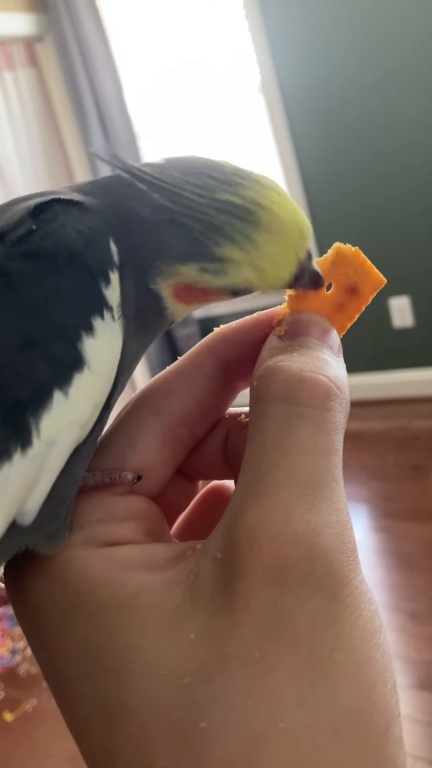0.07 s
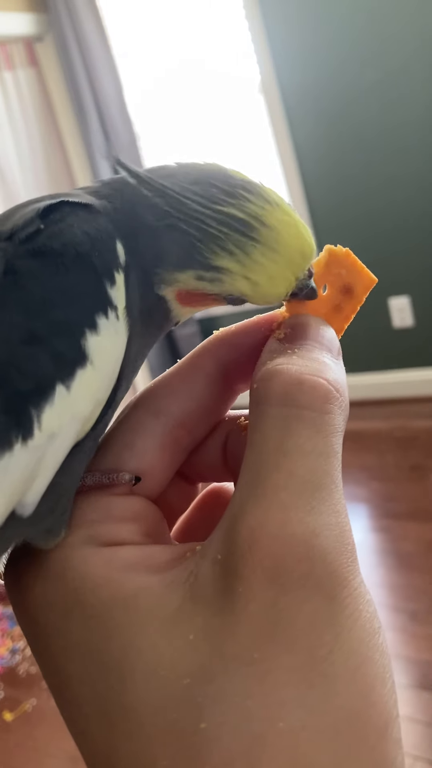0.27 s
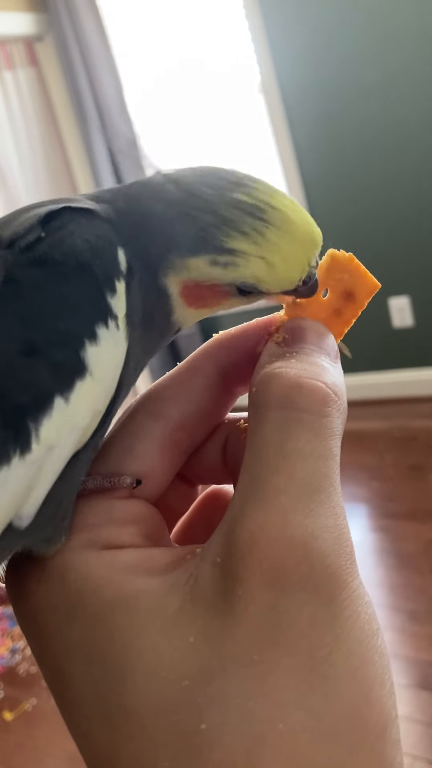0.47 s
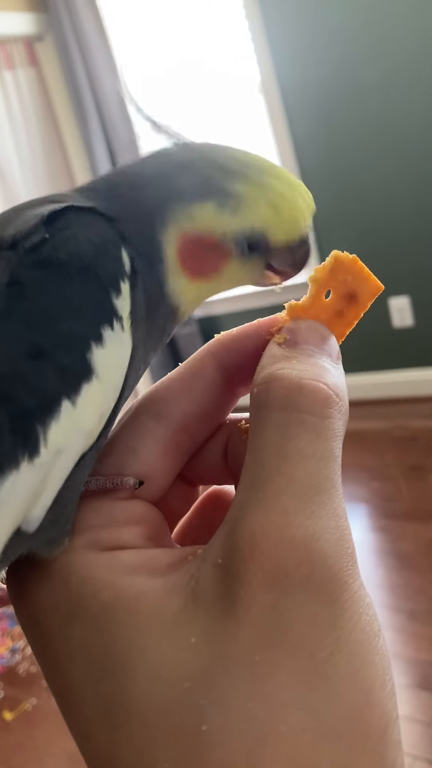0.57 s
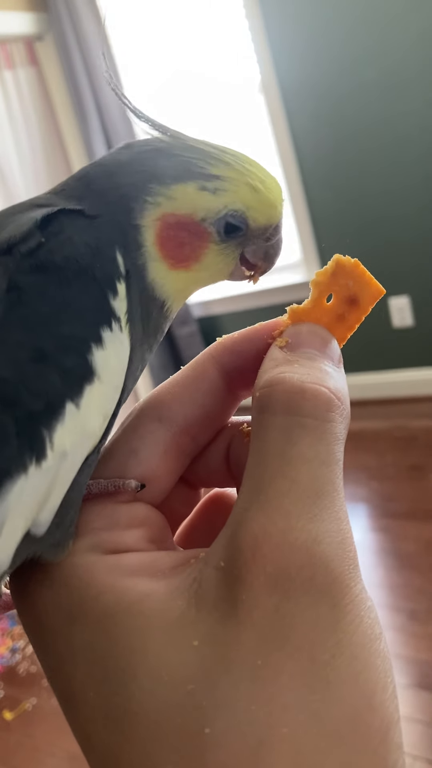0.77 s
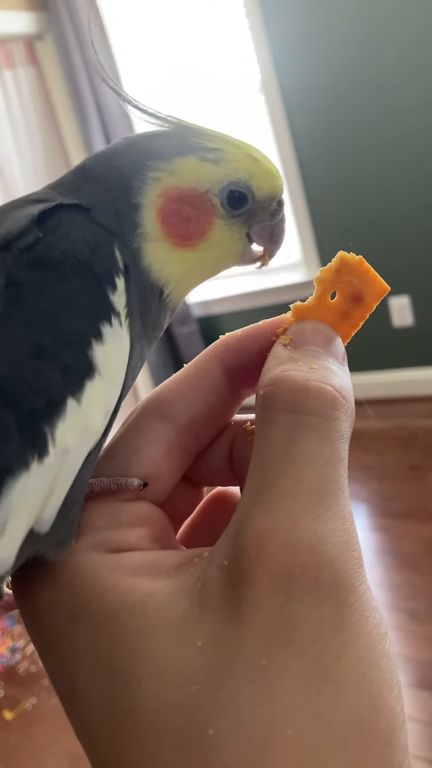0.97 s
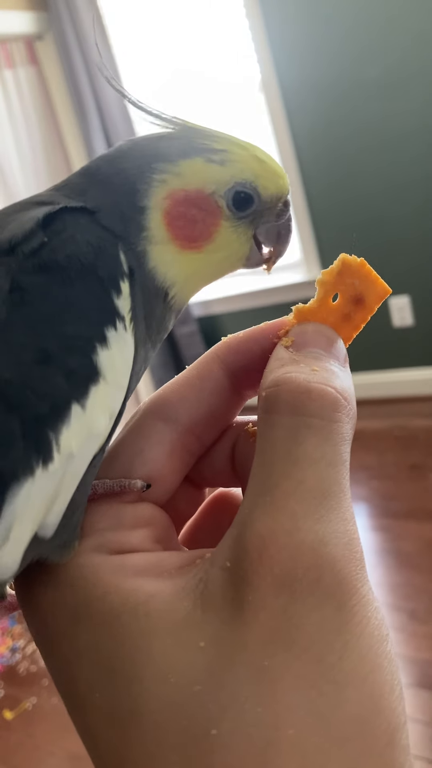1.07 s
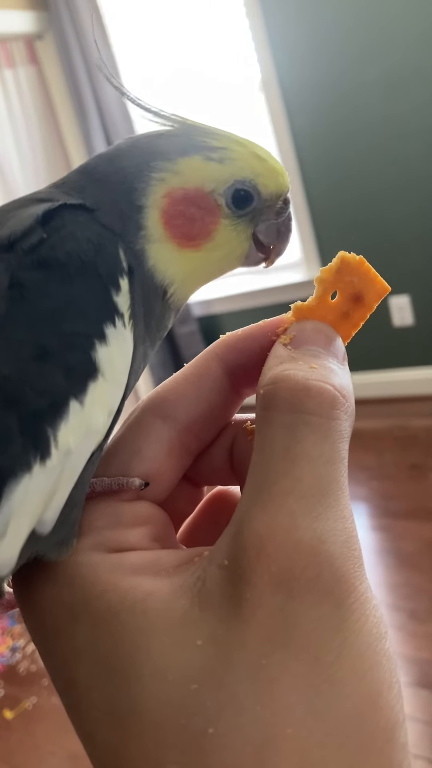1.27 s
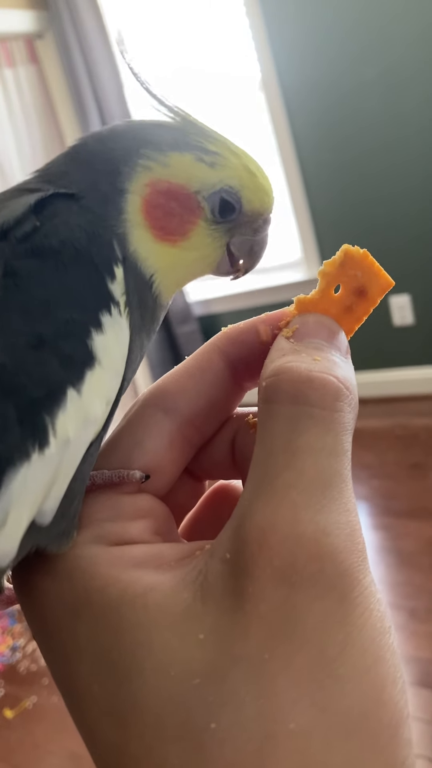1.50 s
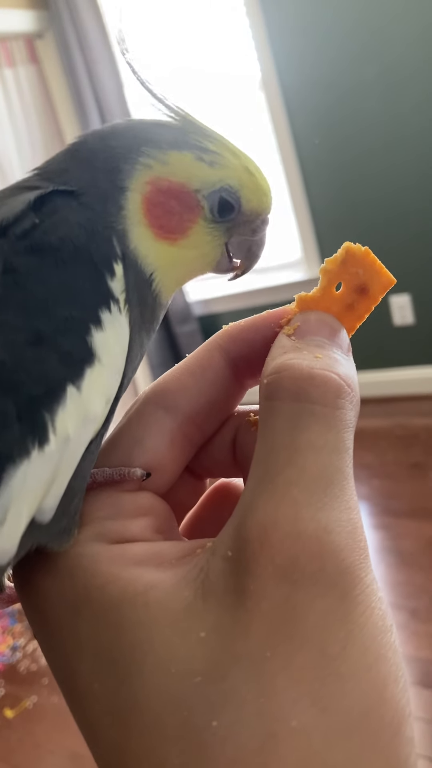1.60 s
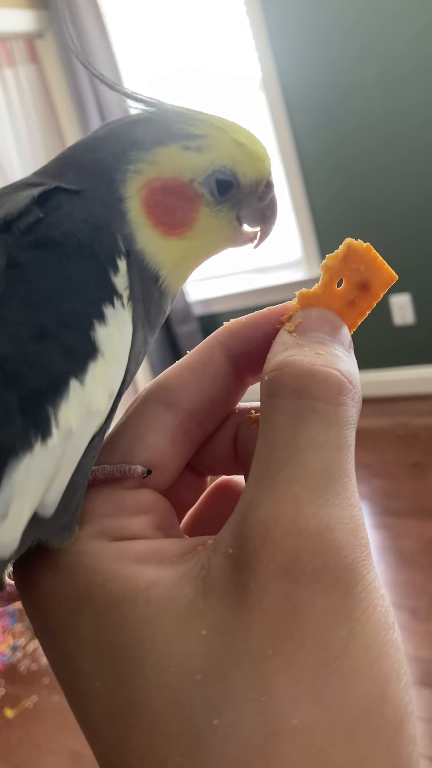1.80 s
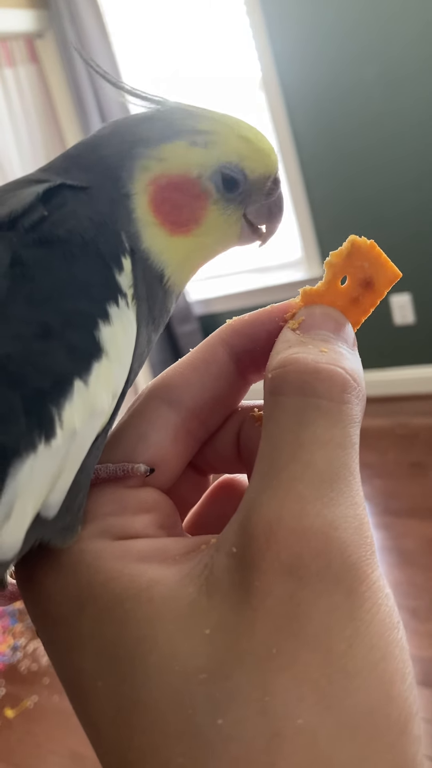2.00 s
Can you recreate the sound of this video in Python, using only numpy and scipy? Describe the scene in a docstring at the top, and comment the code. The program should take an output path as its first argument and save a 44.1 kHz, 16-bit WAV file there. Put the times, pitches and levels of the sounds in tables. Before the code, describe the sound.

A cockatiel crunches a dry cracker close to the microphone. The loudest, sharpest snaps come at about 0.2, 0.3 and 0.4 seconds as it bites pieces off. From 0.6 to 2 seconds it nibbles the crumbs with softer clicks, short crackles and a few tiny hollow beak knocks. The small room adds a soft tail, with a faint rumble and appliance hum throughout.

```python
"""A cockatiel eats a dry cracker close to the microphone, over a low rumble and an appliance's hum.
In the first half second it bites pieces off: each fracture is a snap under a millisecond long.
From then on it nibbles and grinds the crumbs, with softer snaps and short bouts of crackle between.
Now and then the beak closes through a piece with a hollow knock.
A small room answers with a soft tail."""
import sys
import numpy as np
from scipy import signal
from scipy.fft import rfft, irfft, next_fast_len
from scipy.io import wavfile
from scipy.ndimage import uniform_filter1d

SR = 44100
rng = np.random.default_rng(int(sys.argv[2]) if len(sys.argv) > 2 else 0)


def wav_out(sig):
    """Save sig, one row per channel (or a flat mono array), as 16-bit PCM at SR to the path in sys.argv[1]."""
    wavfile.write(sys.argv[1], SR, np.round(np.clip(np.atleast_2d(sig).T, -1, 1) * 32767).astype(np.int16))


N = 90404


def amp(db):
    """Decibels to gain."""
    return 10 ** (np.asarray(db) / 20)


def unit(x):
    """Scales to rms 1."""
    return x / np.sqrt(np.mean(abs(x) ** 2) + 1e-20)


def read(points, hz):
    """Interpolates rows of (Hz, value) along log frequency."""
    f, value = np.transpose(points)
    return np.interp(np.log(hz + 1), np.log(f + 1), value)


def level(points):
    """Gain per sample from rows of (s, dB)."""
    return amp(np.interp(np.arange(N) / SR, *np.transpose(points)))


def colour(x, points):
    """Filters by rows of (Hz, dB)."""
    size = next_fast_len(x.shape[-1] + 4096)
    gain = amp(read(points, np.fft.rfftfreq(size, 1 / SR)))
    return irfft(rfft(x, size) * gain, size)[..., :x.shape[-1]]


def add(mix, start_s, sound):
    """Mixes a sound in at start_s."""
    part = mix[max(round(start_s * SR), 0):][:len(sound)]
    part += sound[:len(part)]


# Rumble spectrum. Each row: frequency in Hz, relative density in dB.
RUMBLE_SPECTRUM = [(15, -30), (29, -26), (44, 6), (80, -2), (100, 0.5), (140, -1), (220, -2.5),
                   (320, -11.5), (500, -15), (1000, -31.5), (2500, -40.5), (6000, -40.5), (16000, -44)]
# Each row: frequency in Hz, left-right coherence from 0 to 1.
RUMBLE_COHERENCE = [(50, .9), (150, 0.83), (300, 0.7), (600, 0.0042), (1200, 0), (16000, 0)]
# Each row: time in seconds, gain in dB.
RUMBLE_ENVELOPE = [(0, 0), (.5, 0.5), (1.05, -1), (1.35, 4.5), (1.7, 2), (2.05, 1.5)]


def rumble(level_db=-63):
    """Low room rumble and faint hiss; only the bass is alike in both channels."""
    hz = np.fft.rfftfreq(N, 1 / SR)
    left, independent = rfft(rng.standard_normal((2, N)))
    coherence = read(RUMBLE_COHERENCE, hz)
    right = coherence * left + np.sqrt(1 - coherence ** 2) * independent
    noise = irfft(np.array([left, right]) * amp(read(RUMBLE_SPECTRUM, hz)), N)
    return unit(noise) * amp(level_db) * level(RUMBLE_ENVELOPE)


# Each row: frequency in Hz, rms waver relative to the tone, envelope as (seconds, dB) points.
HUM_LINES = [(120.1, 0.14, [(0, -63), (.4, -67), (.56, -56.5), (.68, -62.5), (.8, -58.5), (1.03, -67),
             (1.15, -59.5), (1.38, -70), (1.5, -58.5), (1.65, -66), (1.87, -57), (2.05, -72.5)]),
             (164.1, 0.11, [(0, -78.5), (1.12, -73.5), (1.28, -63), (1.7, -62.5), (2.05, -64)]),
             (138.6, 0.48, [(0, -74), (.4, -69), (.6, -80), (.95, -82.5), (1.1, -63.5), (1.3, -66.5),
             (1.45, -84)]), (80.7, 0.11, [(0, -82.5), (.55, -64), (1.2, -75), (1.6, -66), (2.05, -68)]),
             (234.1, 0.82, [(0, -72.5), (1, -77), (2.05, -73)]), (829.5, .4, [(0, -90), (.5, -81),
             (1.1, -103.5), (1.45, -79), (1.7, -103)])]


def appliance_hum(waver_hz=6):
    """Hum lines, each wavering slowly in level and phase."""
    out, t = np.zeros(N), np.arange(N) / SR
    slow = abs(np.fft.fftfreq(N, 1 / SR)) < waver_hz
    for hz, waver, envelope in HUM_LINES:
        noise = rng.standard_normal(N) + 1j * rng.standard_normal(N)
        drift = unit(np.fft.ifft(np.fft.fft(noise) * slow))
        tone = np.exp(2j * np.pi * (hz * t + rng.random()))
        out += np.sqrt(2) * level(envelope) * ((1 + waver * drift) * tone).real
    return out


# Each row: centre in seconds, Gaussian sigma in seconds, crackle level in dB, rubbing in dB re crackle.
GRIND_BOUTS = [(.021, 0.0057, -67.5, 0), (0.079, 0.0091, -67.5, -8), (0.097, 0.012, -69.5, 1.5),
               (0.041, 0.024, -76, 1.5), (0.145, 0.0087, -70.5, 2.5), (0.185, .010, -60, -5.5),
               (0.404, 0.007, -49.5, -11), (0.434, 0.0063, -44.5, -8), (0.488, 0.0082, -58, -33),
               (0.515, 0.016, -62.5, -33), (0.544, 0.0048, -60.5, -34), (0.569, 0.0074, -68, 1),
               (0.639, 0.0096, -62, -9.5), (0.66, 0.0039, -58.5, 2.5), (0.774, 0.014, -75, -12),
               (0.828, 0.014, -64.5, -6), (0.862, 0.0035, -59.5, -1), (0.898, 0.0056, -67.5, -19),
               (.925, .007, -69, -11), (1.041, 0.017, -65.5, -8.5), (1.076, 0.0075, -71.5, -18.5),
               (1.113, 0.0072, -66, -14), (1.148, 0.011, -63, -6.5), (1.297, 0.0036, -67.5, -13.5),
               (1.324, 0.018, -73.5, -7.5), (1.363, 0.0066, -60, -48), (1.385, 0.0045, -64.5, -7),
               (1.412, 0.012, -61, -2), (1.45, 0.009, -65, -6), (1.483, .007, -63, -9),
               (1.505, 0.0049, -57, -1), (1.532, 0.0074, -57.5, -2.5), (1.568, 0.0058, -71, 0),
               (1.592, .008, -67.5, -11.5), (1.723, 0.011, -66, -19), (1.756, 0.0096, -63.5, 1.5),
               (1.905, 0.0051, -75.5, -0.5), (1.926, 0.0088, -69, 6.5), (1.998, 0.0068, -80, -7.5)]
# Spectra of crackle and rubbing. Each row: frequency in Hz, relative level in dB.
CRACKLE_SPECTRUM = [(300, -22.5), (1000, -14.5), (2500, -12), (4200, -6.5), (5800, -1.5), (8000, 6),
                    (10000, 0.5), (12000, -1.5), (14800, 5.5), (16500, 0)]
RUB_SPECTRUM = [(200, -12.5), (600, -1.5), (1100, 1.5), (1700, 0.5), (2600, -4), (5000, -18),
                (16000, -42.5)]


def grinding(grains_per_s=2600, spread_db=4.5):
    """Bouts of tiny random fractures, with the duller rubbing of beak on crumb."""
    t = np.arange(N) / SR
    crackle_gain, rub_gain = np.zeros(N), np.zeros(N)
    for centre_s, sigma_s, db, rub_db in GRIND_BOUTS:
        bout = amp(db) * np.exp(-.5 * ((t - centre_s) / sigma_s) ** 2)
        crackle_gain += bout
        rub_gain += bout * amp(rub_db)
    sizes = amp(spread_db * np.minimum(rng.exponential(1, (2, N)), 5))
    signs = rng.choice([-1, 1], (2, N))
    fractures, scrapes = sizes * signs * (rng.random((2, N)) < grains_per_s / SR)
    crackle = unit(colour(fractures, CRACKLE_SPECTRUM))
    rub = unit(colour(fractures + scrapes, RUB_SPECTRUM))
    return crackle_gain * crackle + rub_gain * rub


# Low end of a snap. Each row: frequency in Hz, level in dB re the knock band.
SNAP_LOW_END = [(150, -11.5), (500, -14.5), (900, -13)]
KNOCK_HZ, BODY_HZ, CRISP_HZ, EDGE_HZ = 1600, 3500, 6800, 9000


def snaps(rows, rise_s=.00011, flatten_hz=3630, size=1024):
    """One tiny ragged burst per row of SNAP_EVENTS: mostly cracks running through the cracker, some of them
    echoes arriving about 3 ms after a snap."""
    out = np.zeros(N)
    t, hz = (np.arange(size) - size // 2) / SR, np.fft.rfftfreq(size, 1 / SR)
    age = np.maximum(t / rise_s + 1, 0)
    for peak_s, db, knock_db, body_db, edge_db in rows:
        burst = rfft(age * np.exp(-age) * rng.standard_normal(size))
        smoothed_power = uniform_filter1d(abs(burst) ** 2, int(flatten_hz / hz[1]))
        burst /= np.sqrt(smoothed_power + 1e-12)  # flat overall, ragged in detail
        shape = [(f, knock_db + low_db) for f, low_db in SNAP_LOW_END]
        shape += [(KNOCK_HZ, knock_db), (BODY_HZ, body_db), (CRISP_HZ, 0), (EDGE_HZ, edge_db)]
        add(out, peak_s + t[0], irfft(burst * amp(db + read(shape, hz))))
    return out


def scatter(x, level_db=-11.5, decay_s=.0011, size=512):
    """Quick bounces off the cracker and the hand add a short ragged decay."""
    bounces = rng.standard_normal(size) * np.exp(-np.arange(size) / SR / decay_s)
    return x + amp(level_db) * signal.fftconvolve(x, bounces / np.linalg.norm(bounces))[:N]


# Snaps, and some of their echoes about 3 ms later. Each row: time in seconds, crisp-band level in dB, then beak
# knock, body and bright edge in dB re that.
SNAP_EVENTS = [(0.0187, -43.5, 19, 8.5, 8.5), (0.026, -41.5, -13, 2, 6), (0.1733, -32, 7, -3, 1.5),
               (0.1807, -31, -5, -14, -8), (0.1865, -26, 0, -19, -2), (0.1994, -13.5, -23, -19, -1),
               (0.2041, -1, -8.5, -3.5, 0.5), (0.208, -13, -3, -4, -8), (0.2132, -6.5, -27, -19, 0),
               (0.2142, -2, -8, -2, -8), (0.2574, -24, -8, -9, -2), (0.3024, 7.5, -21, -3, -6.5),
               (0.3058, -2, -9.5, -8, -2.5), (0.3083, -11, -9, -2, -5), (0.3794, -23, 3.5, -13, 2),
               (0.4006, -22.5, -3, 4, 7.5), (0.4033, -14, -17, 4.5, 6), (0.4057, -18, -16, -9, -1),
               (0.4324, -15, -14, 1, 9), (0.4341, -4, -10, -7, 4.5), (0.4348, -17.5, 7.5, 10, -9),
               (0.4388, -14.5, -24, -19, 3.5), (0.4448, -22, -10, 5, 3), (0.493, -21, -20, -22, 0.5),
               (0.4969, -30, -12, -23, 2), (0.5105, -33, -25, -21, 3), (0.5276, -33, -24, -29, 3),
               (0.6245, -39.5, -4.5, -8, -4), (0.6406, -35.5, -7.5, 8, 8.5), (0.6537, -12.5, -19, -14, 1.5),
               (0.6589, -23.5, -22, -11, 4), (0.7259, -47.5, -3, 9, 12.5), (0.7735, -51, 0, -6, 14.5),
               (0.8124, -43, 12.5, -10, 4.5), (0.8198, -19, -21, -9, -2.5), (0.8233, -30.5, -4.5, -13, 0),
               (0.831, -27.5, -1, -22, -2), (0.862, -19, -0.5, -4.5, 0), (0.9213, -43.5, -5, 2, 10.5),
               (1.0305, -40, -11, -9, 2), (1.0441, -35, -8, -9, 3), (1.0518, -39.5, -2, 3, 6.5),
               (1.1407, -38.5, -11.5, -10, -5.5), (1.1456, -32, 5.5, 3.5, 7), (1.1716, -26, -25.5, -14, 3.5),
               (1.2576, -49.5, -5, -6, 8), (1.297, -37, -9.5, -36.5, 5.5), (1.3244, -40, -9.5, -19, 7),
               (1.3616, -24.5, -24, -33, -4.5), (1.3994, -48, 19, 1, 11), (1.4054, -32.5, 2, -6, 6),
               (1.4139, -16.5, -7, -19.5, -5), (1.4158, -22.5, -7, -10, -4), (1.419, -33, -12, -17, 2),
               (1.5019, -23.5, 1, -3, 5), (1.504, -40, -3, 1, 7), (1.5063, -28, -6, 7, -2),
               (1.5299, -35, -9, 3, -10), (1.5357, -29.5, 8, 6, 5), (1.5742, -29.5, 4.5, -8.5, -0.5),
               (1.7698, -31.5, 18.5, 11.5, 0.5), (1.7735, -39.5, 4.5, -2.5, -0.5),
               (1.9236, -37, 5.5, 0, -3.5)]
# Ring of the cracker, and of the beak holding only a crumb. Each row: frequency in Hz, gain in dB.
CRACKER_RESPONSE = [(2100, -1.5), (2800, 1.5), (3600, -3.5), (4700, -1.5), (5600, -0.5), (6800, -3.5),
                    (8000, -1), (9500, 4.5), (11200, -4), (13000, 0), (15200, -2), (16500, -7.5)]
BEAK_RESPONSE = [(1900, 1), (2600, -1), (3600, -2), (4800, 3), (5900, -6.5), (7400, 3), (9700, -4.5),
                 (11200, -2.5), (12500, -1.5), (14300, 0.5), (15400, -2), (16500, -4.5)]


def direct_fractures(bite_end_s=.55):
    """Snaps toward the microphone: the cracker rings during the bite, the beak afterwards."""
    biting = colour(snaps([row for row in SNAP_EVENTS if row[0] < bite_end_s]), CRACKER_RESPONSE)
    nibbling = colour(snaps([row for row in SNAP_EVENTS if row[0] >= bite_end_s]), BEAK_RESPONSE)
    return scatter(biting) + nibbling


def diffuse_fractures(own_share=.54, typical_body_db=-3.5, typical_edge_db=-4.5):
    """The room hears each snap from all sides, which evens its colour toward a typical one."""
    rows = []
    for peak_s, db, knock_db, body_db, edge_db in SNAP_EVENTS:
        body_db = own_share * body_db + (1 - own_share) * typical_body_db
        edge_db = own_share * edge_db + (1 - own_share) * typical_edge_db
        rows.append((peak_s, db, knock_db, body_db, edge_db))
    return snaps(rows)


# Each row: start in seconds, spectral peak in dB, pitch in Hz.
BEAK_KNOCKS = [(.4339, -10, 905), (.8203, -22.5, 1020), (0.8326, -23, 1150), (0.8614, -16.5, 1415),
               (1.414, -25.5, 1050), (1.5356, -16.5, 720), (1.769, -14.5, 1560)]


def beak_knocks(decay_s=.00057, size=512):
    """The beak closes through a piece: a short, hollow damped tone."""
    out, t = np.zeros(N), np.arange(size) / SR
    for start_s, db, hz in BEAK_KNOCKS:
        knock = np.sin(2 * np.pi * hz * t) * np.exp(-t / decay_s)
        add(out, start_s, amp(db) * knock / abs(rfft(knock)).max())
    return out


# Each row: frequency in Hz, left minus right phase in radians.
PORT_PHASE_RAD = [(250, -1.5), (700, -2.5), (1200, -2), (2000, -4.5), (3000, -2), (4000, -5.5),
                  (5600, -2.5), (8600, -0.5), (11800, 3), (15000, 6.5), (16000, 8.5)]
# Each row: frequency in Hz, left minus right level in dB.
PORT_BALANCE_DB = [(300, 5.5), (600, -3.5), (1000, 1.5), (1600, -14.5), (2400, -8.5), (3200, -2),
                   (3750, 11), (4500, 4), (7000, -1.5), (16000, 0)]


def microphone_ports(x):
    """Direct sound reaches each of the two ports with its own phase and colour."""
    size = next_fast_len(N + 4096)
    hz = np.fft.rfftfreq(size, 1 / SR)
    ratio = amp(read(PORT_BALANCE_DB, hz))
    half_phase = np.exp(.5j * read(PORT_PHASE_RAD, hz))
    pair = np.array([ratio * half_phase, 1 / half_phase]) * np.sqrt(2 / (1 + ratio ** 2))
    return irfft(rfft(x, size) * pair, size)[:, :N]


# Each row: frequency in Hz, time to fall 60 dB in seconds.
ROOM_T60_S = [(300, 1.5), (1500, 0.47), (4000, 0.34), (9000, 0.27), (15000, 0.41)]
# Each row: frequency in Hz, tail gain in dB.
ROOM_TAIL_DB = [(300, -9), (800, -13.5), (1500, -10), (2800, -13), (4000, -8), (5700, -20), (8000, -13),
                (10000, -12.5), (12000, -22), (14500, -16), (16500, -21.5)]


def room(x, delay_s=.0036, build_s=.0028):
    """A diffuse tail, different at each port, each band dying at its own speed."""
    hz, t, bands = signal.stft(rng.standard_normal((2, SR)), SR, nperseg=256)
    decay = amp(-60 * t / read(ROOM_T60_S, hz)[:, None])
    tail = signal.istft(bands * decay, SR, nperseg=256)[1]
    tail *= np.clip((np.arange(tail.shape[1]) / SR - delay_s) / build_s, 0, 1)
    tail = colour(tail / np.linalg.norm(tail[0]), ROOM_TAIL_DB)
    return signal.fftconvolve(x[None], tail, axes=1)[:, :N]


def scene(background_left_right_db=(1.03, -1.03), knock_send_db=-1.5):
    """Close eating sounds and their room tail over rumble and hum."""
    background = (rumble() + appliance_hum()) * amp(background_left_right_db)[:, None]
    crumbs, knocks = grinding(), beak_knocks()
    direct = microphone_ports(crumbs + direct_fractures() + knocks)
    tail = room(crumbs + diffuse_fractures() + amp(knock_send_db) * knocks)
    return background + direct + tail


def record(dry, cutoff_hz=16400):
    """A steep low-pass removes the highest treble."""
    lowpass = signal.firwin(201, cutoff_hz, window=("kaiser", 8), fs=SR)
    return signal.oaconvolve(dry, lowpass[None], "same")


dry = scene()
out = record(dry)
wav_out(out)
```